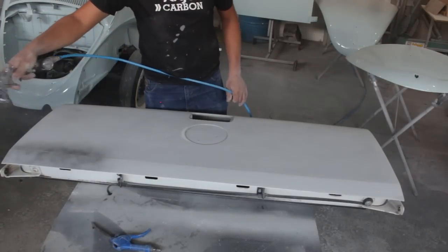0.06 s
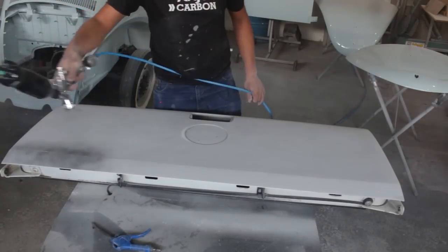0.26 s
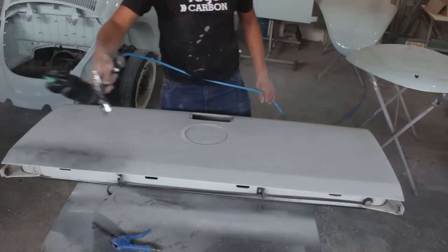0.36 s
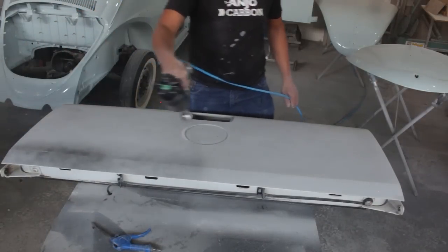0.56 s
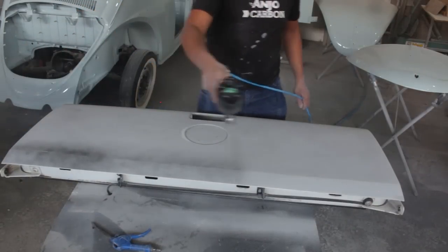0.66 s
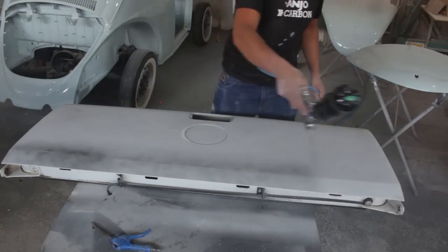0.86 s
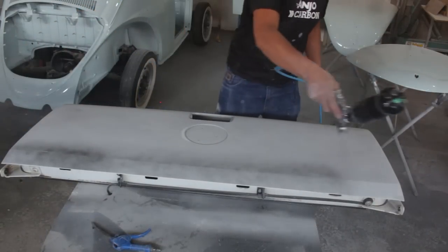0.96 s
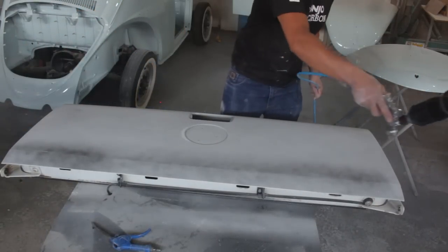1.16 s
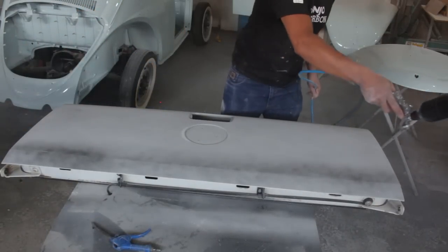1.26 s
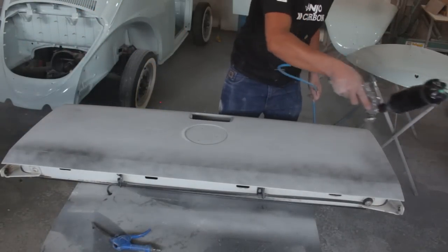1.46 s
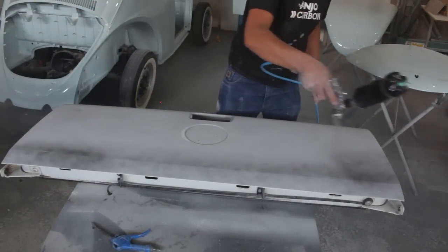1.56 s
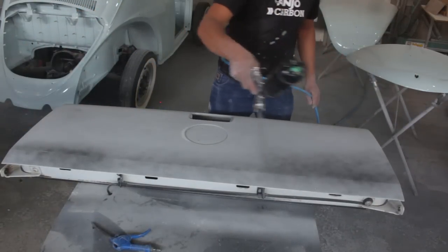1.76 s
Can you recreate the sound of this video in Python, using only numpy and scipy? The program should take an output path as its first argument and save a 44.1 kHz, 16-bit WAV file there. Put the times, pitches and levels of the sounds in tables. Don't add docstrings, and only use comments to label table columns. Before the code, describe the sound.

Spray gun hissing across a steel panel in a workshop; a fading tail first, then a sudden loud puff and continuous airy rush with shifting colour and faint low hose knocks, picked up by a mono camera microphone.

```python
import sys
import numpy as np
from scipy import signal
from scipy.fft import rfft, irfft, next_fast_len
from scipy.io import wavfile
from scipy.ndimage import uniform_filter1d, map_coordinates

SR = 44100
rng = np.random.default_rng(int(sys.argv[2]) if len(sys.argv) > 2 else 0)


def natural_amplitude(level_db):
    exponent = np.asarray(level_db, float) / 20
    return 10 ** exponent


def master(y):
    cut = np.clip(np.atleast_2d(y).T, -1, 1)
    pcm = np.round(cut * 32767)
    wavfile.write(sys.argv[1], SR, pcm.astype(np.int16))


N = 79380
LEAD = 16384
M = N + LEAD
T = (np.arange(M) - LEAD) / SR
OPEN_S, RISE_S = 0.2081, 0.016


def unit(x):
    return x / np.sqrt(np.mean(np.abs(x) ** 2) + 1e-20)


def along(points, hz):
    f, v = np.transpose(points)
    return np.interp(np.log(hz + 1), np.log(f + 1), v)


def steady(points):
    return lambda hz, s: natural_amplitude(along(points, hz))


def wobble(rate):
    knots = rng.standard_normal(int(M * rate / SR) + 4)
    return map_coordinates(knots, [np.arange(M) * rate / SR])


def rush(gain, patchy_db, size=512):
    hz, s, z = signal.stft(rng.standard_normal(M), SR, nperseg=size)
    patches = uniform_filter1d(rng.standard_normal(z.shape), size=6, axis=0)
    patches = unit(uniform_filter1d(patches, size=10, axis=1))
    g = np.abs(gain(hz[:, None], s - LEAD / SR)) * np.ones(z.shape)
    g = g / np.sqrt(np.mean(g ** 2, axis=0))
    return unit(signal.istft(z * g * natural_amplitude(patchy_db * patches), nperseg=size)[1][:M])


# pitch_hz, level_db [dB per Hz]
SHOP_HISS = [(290, -15), (500, -15), (594, -11.5), (997, 1.5), (1150, -1.5), (1700, 0.5), (8600, -3),
             (15500, -13)]
# pitch_hz, level_db [dB per Hz]
RUMBLE_COLOUR = [(15, -29), (25, -0.5), (59, 0.5), (263, -12), (293, -19.5), (325, -10.5), (600, -11.5),
                 (780, -23), (1320, -120)]
# pitch_hz, level_db [dB rms]
MOTOR_HUM = [(236.9, -71), (296.1, -69.5), (360.7, -69)]
HISS_DB, RUMBLE_DB = -46, -55


def shop():
    hum = np.zeros(M)
    for hz, db in MOTOR_HUM:
        level = np.sqrt(2) * natural_amplitude(db + 1.6 * wobble(5.42))
        hum += level * np.sin(2 * np.pi * hz * T + 0.6 * wobble(3.87))
    rumble = natural_amplitude(RUMBLE_DB + wobble(8.77)) * rush(steady(RUMBLE_COLOUR), patchy_db=0.5, size=4096)
    hiss = natural_amplitude(HISS_DB) * rush(steady(SHOP_HISS), patchy_db=1.5)
    return hiss + rumble + hum


# pitch_hz, t60_s
ROOM_DECAY = [(200, 1), (2000, 0.93), (8000, .6), (15000, 0.37)]


def room(x):
    hz, t, z = signal.stft(rng.standard_normal(SR), SR, nperseg=256)
    decay = natural_amplitude(-60 * t / along(ROOM_DECAY, hz)[:, None])
    tail = signal.istft(z * decay, SR, nperseg=256)[1]
    late = np.pad(x, (300, 0))
    return signal.fftconvolve(late, tail / np.linalg.norm(tail))[:M]


# start_s, level_db, pitch_hz, t60_s
KNOCKS = [
    (.22, -37, 143, 0.14),
    (.705, -42, 36, 0.12),
    (1.071, -40, 85, 0.07),
    (1.739, -43, 54, 0.48),
]


def thumps():
    out = np.zeros(M)
    for start_s, db, hz, t60 in KNOCKS:
        t = np.clip(T - start_s, 0, 9)
        out += natural_amplitude(db - 60 * t / t60) * (1 - np.exp(-t / 0.0038)) * np.sin(2 * np.pi * hz * t)
    return out


def opening():
    still_shut = 1 - np.clip((T - OPEN_S) / RISE_S, 0, 1)
    return natural_amplitude(-36 * still_shut ** 1.42) * (T > OPEN_S)


# pitch_hz, level_db [dB per Hz]
SURGE_COLOUR = [(100, -29.5), (900, -29.5), (2350, -12), (3600, -25), (6200, -7), (9400, 0.5), (13600, -10),
                (14900, -10.5)]
# pitch_hz, level_db [dB per Hz]
LAST_PASS = [(240, -46), (400, -40), (2020, -11), (2460, -15), (2700, -6), (2830, -13.5), (9420, -0.5),
             (14300, -8), (15900, -17)]
HOLD_S, SURGE_DB, SURGE_T60 = 0.0096, -8, 0.14
SHUT_S, LAST_DB, SHUT_T60 = -0.0081, -24, 0.24


def surges():
    drain = natural_amplitude(LAST_DB - 60 * np.clip(T - SHUT_S, 0, 9) / SHUT_T60)
    since_full = np.clip(T - OPEN_S - RISE_S - HOLD_S, 0, 9)
    burst = opening() * natural_amplitude(SURGE_DB - 60 * since_full / SURGE_T60 + 1.3 * wobble(350))
    return (burst * rush(steady(SURGE_COLOUR), patchy_db=-0.6)
            + drain * rush(steady(LAST_PASS), patchy_db=-1.6))


# time_s, jet_db, side_on [0-1], roar_db, roar_hz, echo_ms, rim_echo [0-1]
GUN_PATH = [(.25, -26, 0, -49, 2300, .72, 0.2), (.41, -26.5, 0, -43, 1910, .71, 0),
            (.46, -27, 0, -36, 1660, 0.71, 0.06), (.62, -28, 0, -36.5, 1570, 0.73, 0),
            (.82, -27.5, 0, -37, 1610, 0.7, 0), (1.0, -27.5, 0, -39, 1650, .67, 0.3),
            (1.15, -28, 0.2, -39, 1640, .65, 0.8), (1.25, -30, 0.66, -36, 1670, .63, 0.8),
            (1.35, -28, .9, -40, 1770, 0.635, 0.56), (1.41, -27.5, 0.9, -50, 2080, 0.644, 0.5),
            (1.485, -26.5, 0.5, -51, 1830, 0.63, 0.5), (1.505, -28, 0.4, -37, 1520, 0.67, 0.3),
            (1.55, -27.5, 0.35, -40.5, 1310, 0.69, 0.6), (1.68, -29.5, 0.16, -41, 1330, 0.75, 0.16),
            (1.8, -29.5, 0.3, -43.5, 1370, 0.74, .05)]


def sweep(s):
    t, *cols = np.transpose(GUN_PATH)
    return [np.interp(s, t, c) for c in cols]


def roar():
    def colour(hz, s):
        off = np.log((hz + 1) / sweep(s)[3]) / 0.18
        off = np.where(off < 0, 1.16 * off, off)
        return np.exp(-off ** 2) + 0.48 * np.exp(-(off / 2.97) ** 2)
    level = natural_amplitude(sweep(T)[2] + 1.3 * wobble(30.03))
    return opening() * level * rush(colour, patchy_db=0.0)


# pitch_hz, level_db [dB per Hz]
JET_FRONT = [(240, -60), (520, -26.5), (1100, -15), (2400, -11), (5500, -11), (8500, -1), (12200, -12),
             (15000, -16.5)]
# pitch_hz, level_db [dB per Hz]
JET_SIDE = [(400, -23), (1500, -6), (3000, -2), (6000, -8), (8900, 0.5), (10600, -5), (12800, -2.5),
            (15000, -18)]
ECHO, ECHO_HZ = 0.2, 8300
RIM_HZ, RIM_DELAY = 4920, 0.51
LOBE_MS, LOBE_SHIFT = 0.7, 0.84


def jet():
    def near(hz, centre_hz, width):
        return np.exp(-(np.log((hz + 1) / centre_hz) / width) ** 2)

    def colour(hz, s):
        _, side, _, _, ms, rim = sweep(s)
        side = np.clip(side, 0, 1)
        turn = -2j * np.pi * hz * ms / 1000
        sheet_echo = ECHO * near(hz, ECHO_HZ, 0.47) * np.exp(turn)
        rim_echo = rim * near(hz, RIM_HZ, 0.28) * np.exp(RIM_DELAY * turn)
        seen = hz * (ms / LOBE_MS) ** LOBE_SHIFT
        hiss_db = (1 - side) * along(JET_FRONT, seen) + side * along(JET_SIDE, seen)
        return natural_amplitude(hiss_db) * (1 + sheet_echo - rim_echo)
    level = natural_amplitude(sweep(T)[0] + 0.38 * wobble(16) + 0.51 * wobble(300))
    return opening() * level * rush(colour, patchy_db=0.5)


def scene():
    gun = jet() + roar() + surges()
    mix = gun + natural_amplitude(-11) * room(gun) + thumps() + shop()
    return np.tile(mix[LEAD:], (2, 1))


def top_cut(x):
    return signal.sosfilt(signal.butter(12, 16320, fs=SR, output="sos"), x)


# pitch_hz, level_db
MIC_COLOUR = [(13800, 0.5), (14800, -3.5), (15300, 1), (15800, -21)]


def record(dry):
    m = next_fast_len(N + 8192)
    hz = np.fft.rfftfreq(m, 1 / SR)
    response = natural_amplitude(along(MIC_COLOUR, hz)) * (hz < 15900)
    heard = irfft(rfft(np.clip(dry, -1.15, 1.15), m) * response, m)[:, :N]
    return top_cut(np.clip(heard, -1, 1))


dry = scene()
out = record(dry)
master(out)
```